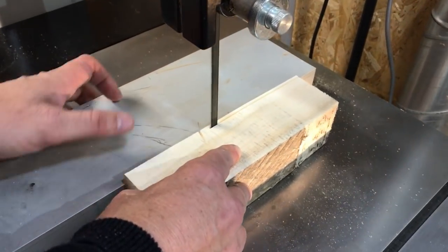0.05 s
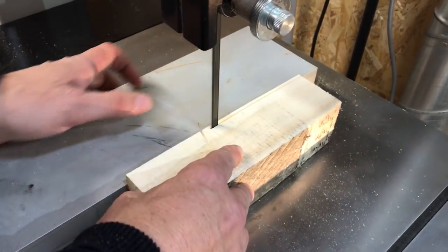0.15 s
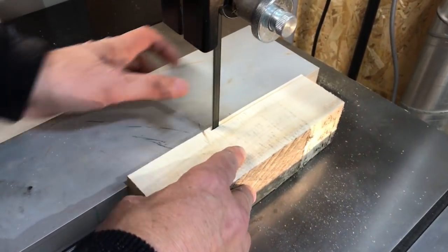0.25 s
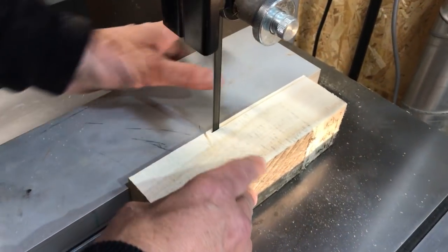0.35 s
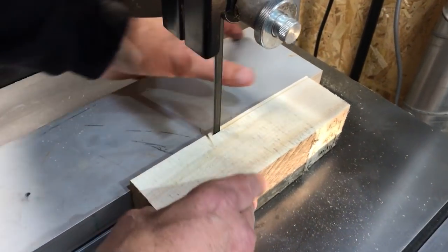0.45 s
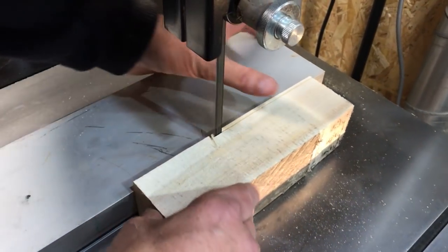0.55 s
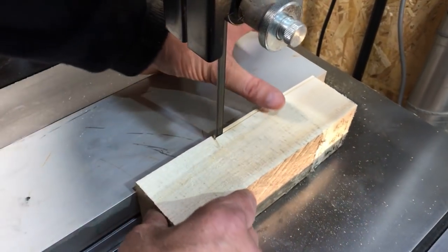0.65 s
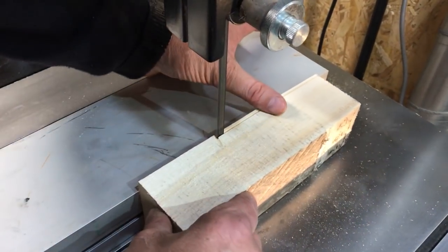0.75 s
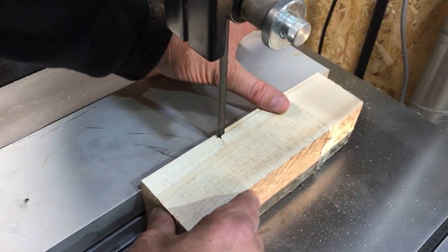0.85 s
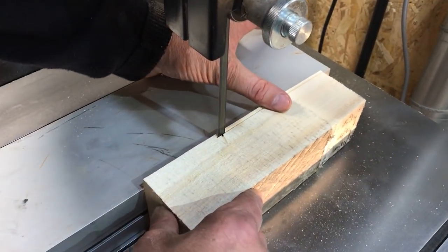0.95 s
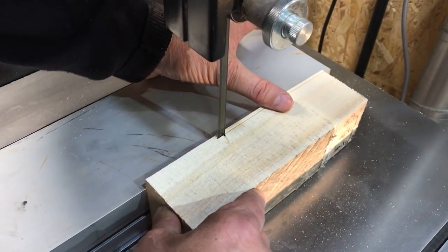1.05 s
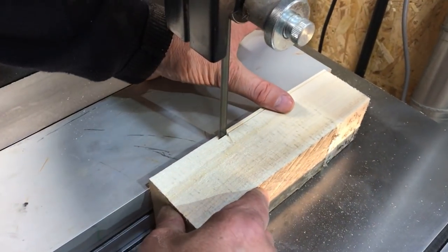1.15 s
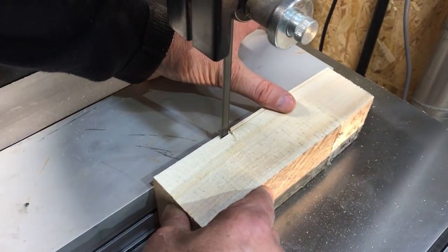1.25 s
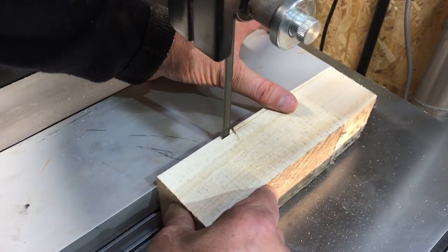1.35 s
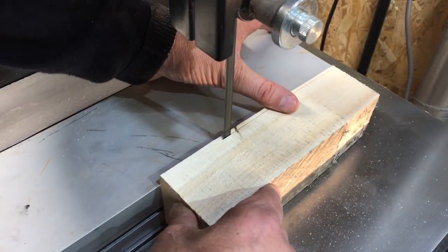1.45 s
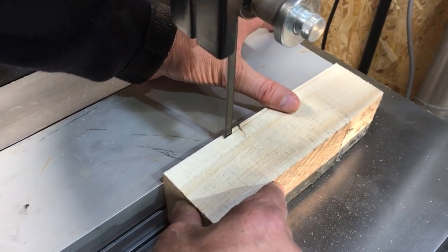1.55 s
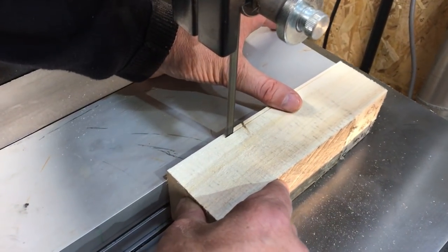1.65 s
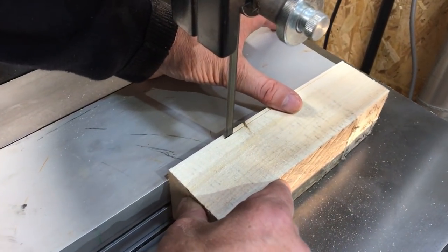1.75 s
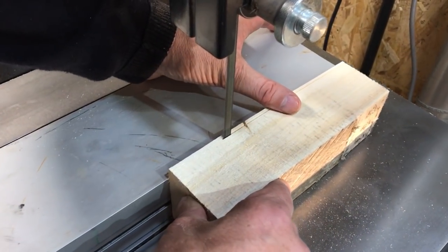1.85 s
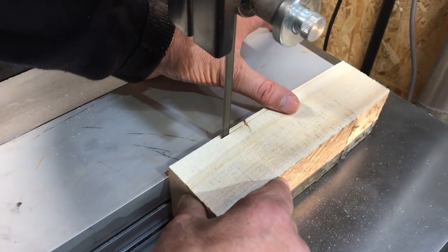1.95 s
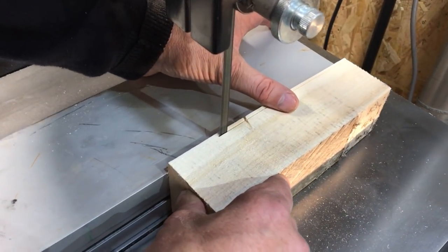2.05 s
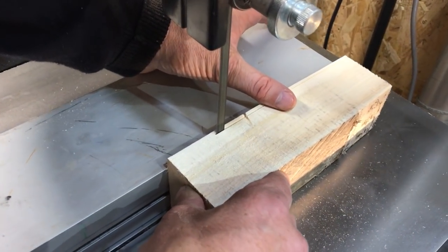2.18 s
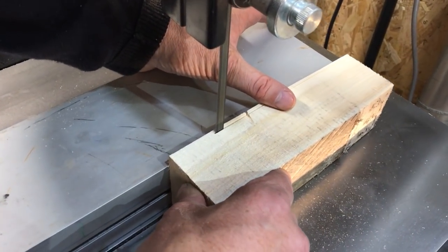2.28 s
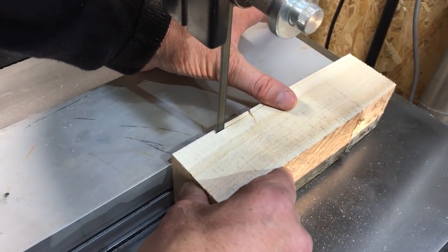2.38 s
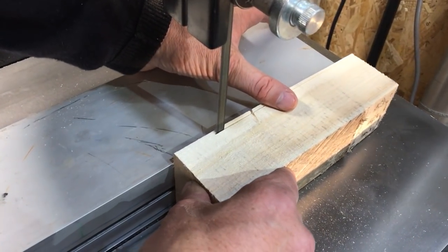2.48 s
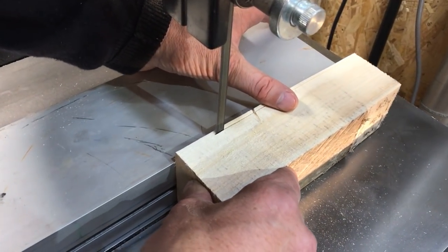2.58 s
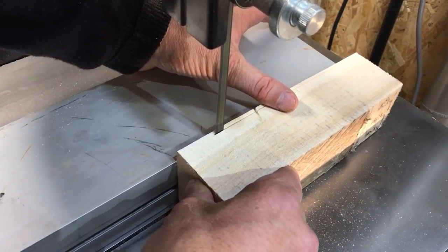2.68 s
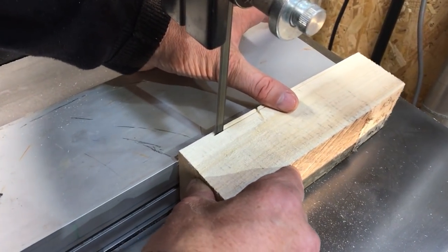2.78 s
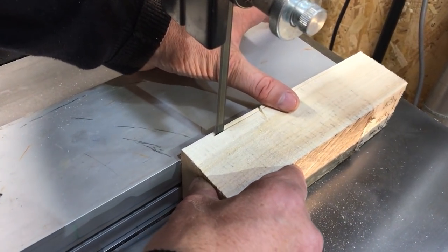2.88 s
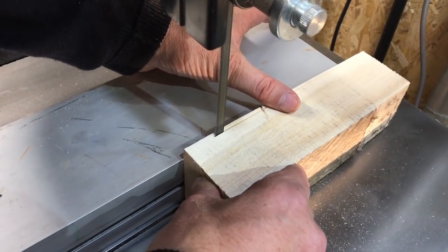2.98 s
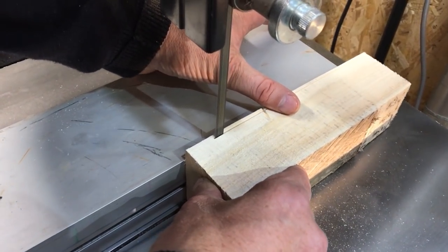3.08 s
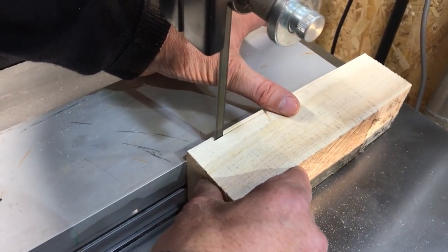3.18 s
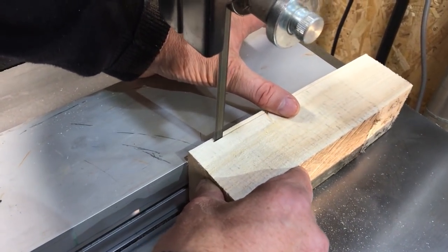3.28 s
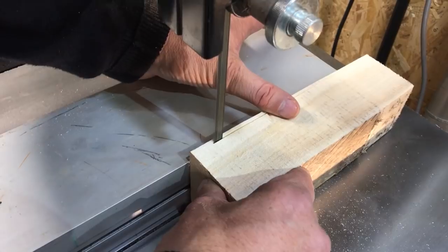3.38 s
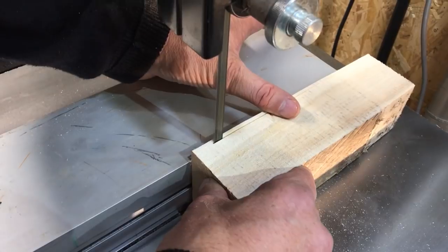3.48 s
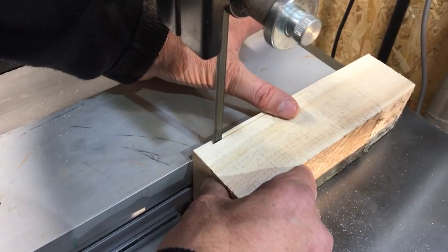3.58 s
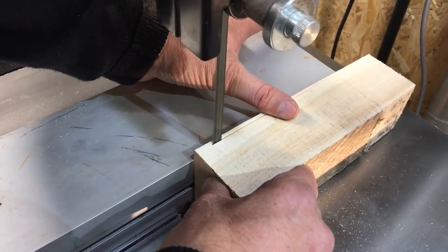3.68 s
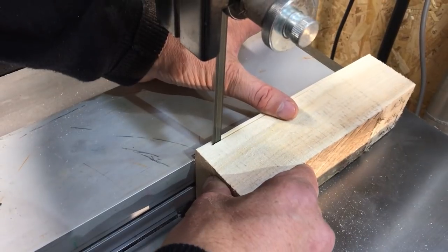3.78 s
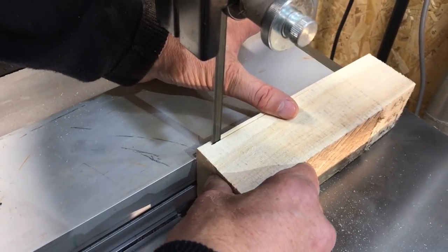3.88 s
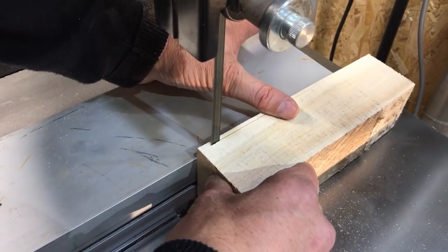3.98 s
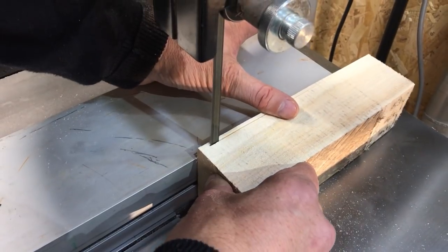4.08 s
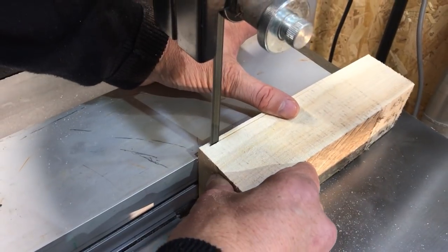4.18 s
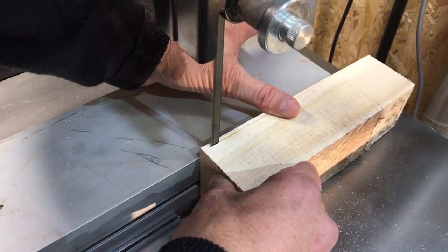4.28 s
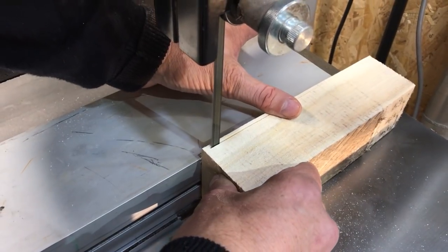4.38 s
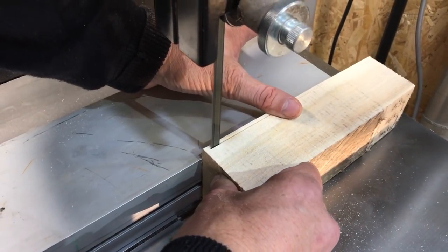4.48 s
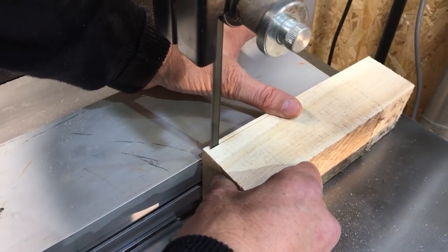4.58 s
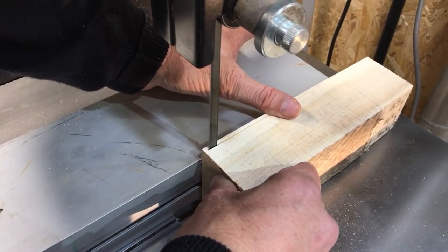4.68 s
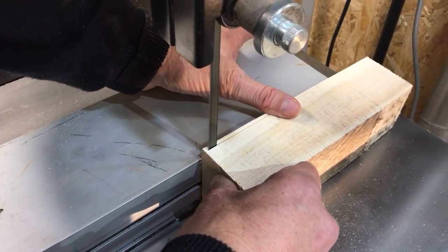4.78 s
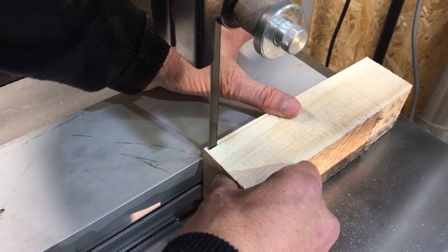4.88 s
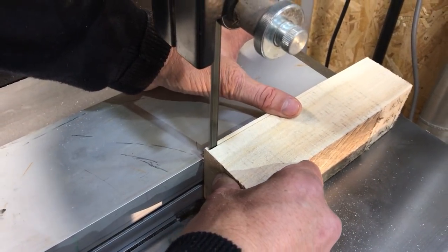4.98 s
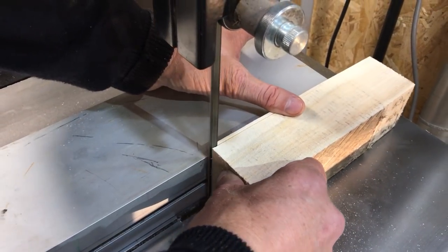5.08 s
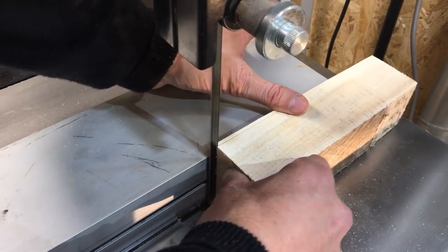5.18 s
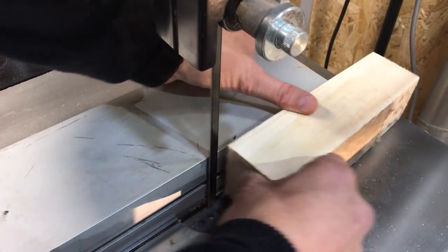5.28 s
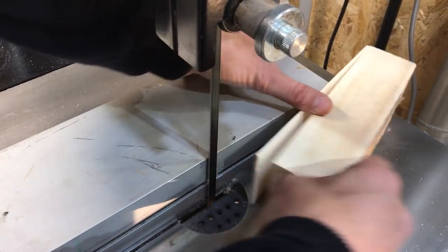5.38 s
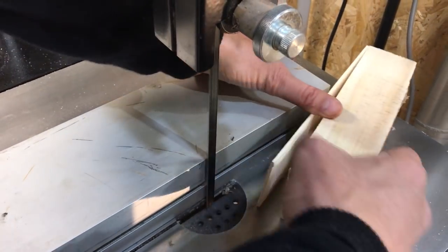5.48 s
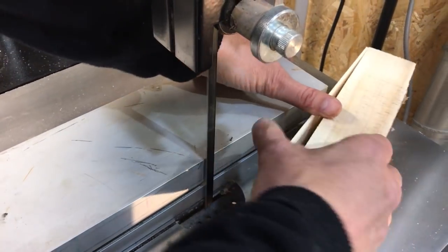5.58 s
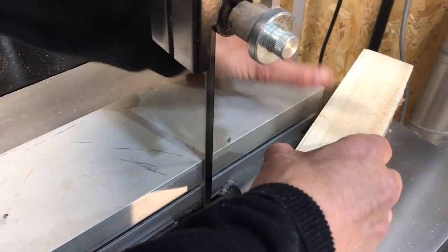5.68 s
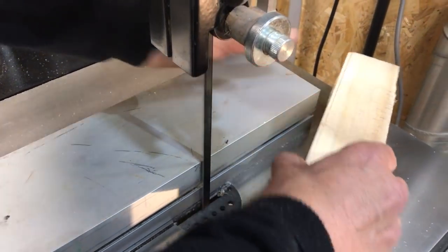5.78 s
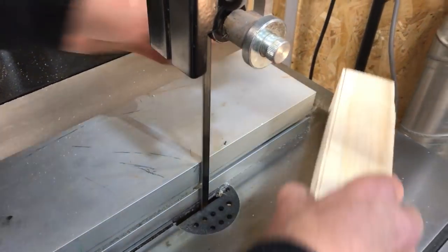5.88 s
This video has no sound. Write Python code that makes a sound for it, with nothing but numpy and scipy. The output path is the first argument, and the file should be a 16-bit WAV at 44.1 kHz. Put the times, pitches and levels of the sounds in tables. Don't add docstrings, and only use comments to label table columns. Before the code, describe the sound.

From the first instant a bandsaw is cutting through a wooden block, loud and close to a phone in a small, short-echoed workshop. The sound is a dense, rough, ringing whine, strongest around 700 to 1500 Hz, with bright chip hiss above it and thin whistles at steady high pitches. It throbs quickly and unevenly; short sung tones swell and fade, and tiny dips and surges mark the teeth catching in the grain. From 1.5 to 4 seconds the ring shifts slightly as the slit lengthens. From about 4.4 seconds it becomes more hollow and tonal, near 750 Hz, and the finest hiss opens up at 4.8. At about 5.18 seconds a last puff of chips ends the cut abruptly. A metallic frame ring falls away fast, leaving a much quieter whirr and low motor hum that gradually rise until 6 seconds, with a few faint bright ticks at 5.4, 5.5, 5.75 and 5.87.

```python
import sys
import numpy as np
from scipy import signal
from scipy.fft import rfft, irfft, next_fast_len
from scipy.io import wavfile
from scipy.ndimage import map_coordinates

SR = 44100
rng = np.random.default_rng(int(sys.argv[2]) if len(sys.argv) > 2 else 0)


def linear_from_db(decibels):
    return 10 ** (np.asarray(decibels, float) / 20)


def dump_mix(stems):
    frames = np.atleast_2d(stems).T
    limited = np.clip(frames, -1, 1)
    pcm = np.round(limited * 32767).astype(np.int16)
    wavfile.write(sys.argv[1], SR, pcm)


N = 261950
T = np.arange(N) / SR
EXIT_S, EASE_S = 5.178, .012
TOP_OFF_DB_PER_S = 480

# t/s, f/Hz
TOOTH_RATE = [(0, 2273), (.5, 2279), (1.1, 2274.5), (1.8, 2272.5), (2.1, 2274), (2.4, 2272), (2.8, 2274),
              (3.15, 2273), (3.35, 2278), (3.75, 2277.5), (4.4, 2284), (4.8, 2288), (5.2, 2290)]
# t/s, level/dB
FEED = [(0, .5), (1.2, .5), (2.2, -.4), (3.7, -0.5), (4.3, -1.4), (4.9, 0), (5.12, -1)]
LOOP_HZ = 4.7


def cut():
    turn = np.cumsum(curves(TOOTH_RATE)[0]) / SR
    feed_db, = curves(FEED)
    throb_db = 0.47 * np.sin(4 * np.pi * LOOP_HZ * T + 0.11) + .5 * np.sin(8 * np.pi * LOOP_HZ * T + 0.26)
    throb_db = throb_db + 0.71 * wobble(22.21) + 1.45 * wobble(60)
    return block(turn, feed_db, throb_db) + chips(turn, feed_db, throb_db) + song() + whistle(turn)


def tearing(turn, depth, grit_db):
    tooth_gain = linear_from_db(grit_db * rng.standard_normal(int(turn[-1]) + 2))
    size = tooth_gain[turn.astype(int)]
    return unit(rng.standard_normal(N) * size * (1 + depth * np.cos(2 * np.pi * turn)))


# t/s, ring change/dB, chip change/dB, length/s
BITES = [(.08, 0, 1.5, .02), (0.42, -2, 0, 0.049), (1.67, -3, 0, .02), (3.96, 0, -2, .02),
         (3.37, 0, -1, .02), (2.0, 1, 1, .03), (0.529, -5, -2.4, 0.012), (0.64, -4, 0, 0.012),
         (0.875, -4, -1.5, 0.02), (1.033, -0.5, 0.2, 0.08), (1.613, -3.5, -3.5, 0.02),
         (1.753, 2.5, 1.7, 0.066), (1.856, -0.5, -3, 0.06), (2.225, 1.5, 3, 0.027),
         (2.705, 1.7, -0.5, 0.019), (2.84, -1, -1.5, 0.055), (3.083, 0.2, 1.5, 0.082),
         (3.322, -3.2, -3, 0.03), (3.444, -1.5, -6, 0.025), (3.501, 3.5, 0.5, 0.021), (3.6, 3, 3, 0.011),
         (3.836, 1.3, 1.6, 0.05), (4.171, -0.5, -1.4, 0.02), (4.306, -2.5, -2.0, 0.03),
         (4.477, 1.5, 2.0, 0.02), (4.624, -0.3, -4, 0.017), (4.734, -3.5, -7, 0.029),
         (4.854, 1.5, 3.5, 0.058), (4.859, -5, -8, 0.0099), (5.008, 0.5, 5.5, 0.018),
         (5.047, 0, -2.5, .006), (5.092, 0, -3, .008), (5.11, 1, 3.5, .015), (4.772, 0, -2.5, .006),
         (5.068, -2, -3.5, 0.03)]


def ring_bites_db():
    return bumps([(s, db, life) for s, db, _, life in BITES])


# f/Hz, width/Hz, level/dB
BLOCK_EARLY = [(687, 96, -13), (712, 18, 0), (1214, 29, -10.5), (1295, 32.5, 1.5), (1447, 32, -5),
               (1815, 66, -11.5), (2034, 72, -12), (2620, 25, -13), (2770, 78, -16), (3025, 53, -11),
               (3490, 160, -26)]
BLOCK_MIDDLE = [(664, 19, -9.5), (736, 35, -1.5), (1247, 42, -5), (1316, 27.5, 0.5), (1435, 34, -0.5),
                (1761, 28, -5), (1999, 52, -3), (2540, 120, -11.5), (2765, 180, -13), (3027, 32, -3.5),
                (3700, 125, -16)]
BLOCK_LATE = [(571.6, 8.9, -9), (746, 17, 0), (910, 30, -8.5), (1090, 22, -14), (1286, 22, -1.5),
              (1513, 12, -6.5), (1834, 55, -19), (2065, 23, -6), (3040, 45, -15), (4020, 140, -24)]
BLOCK_LAST = [(521, 8.7, -10), (757, 4.4, 8), (834, 17, -6), (989, 16, -9), (1123, 25, -4), (1263, 26, -6),
              (1480, 16, -5.5), (1726, 16, -6), (1920, 310, -18), (3014, 35, -10), (3750, 58, -25)]
# t/s, low ring level/dB, upper ring level/dB, grip on table level/dB
STAGES = [
    (.4, -14, -17.5, -4.5),
    (1.6, -14.5, -17.5, -1),
    (3.3, -16.5, -20, 0),
    (4.5, -13.5, -12.5, -8),
    (4.9, -15, -16.5, -6),
]
# f/Hz, density/dB per Hz
TEAR = [(300, -17), (480, -10), (800, -8), (1050, -4), (1600, -3.5), (2300, -2.5), (3200, -3.5),
        (4300, -4.5), (6000, -36)]
# f/Hz, width/Hz, level/dB
TABLE = [(512, 10, -17), (582, 12, -9), (633, 12, -13), (723, 10, -5), (828, 14, -10), (898, 14, -13),
         (1112, 10, -15), (1141, 10, -14), (1300, 24, -9), (1417, 12, -3), (1613, 10, -10), (1747, 10, -3),
         (1910, 12, -10), (1998, 14, -4), (2470, 14, -6), (2550, 20, -11)]
LET_GO_S, LET_GO_DB = 5.05, -7
RING_OFF_DB_PER_S = 200


def block(turn, feed_db, throb_db):
    stage_s = [row[0] for row in STAGES]
    low_db, upper_db, grip_db = curves(STAGES)
    force = tearing(turn, depth=0.54, grit_db=1.0)
    wood = linear_from_db(-20.5) * filtered(force, shape(TEAR))
    stage_modes = (BLOCK_EARLY, BLOCK_EARLY, BLOCK_MIDDLE, BLOCK_LATE, BLOCK_LAST)
    for share, table in zip(np.eye(len(STAGES)), stage_modes):
        wood = wood + np.interp(T, stage_s, share) * filtered(force, modes(table))
    steel = linear_from_db(grip_db) * filtered(tearing(turn, depth=0.34, grit_db=2.0), modes(TABLE))
    low, upper = split(walls(wood + steel, t60=.2, wet_db=-14), hz=1600)
    ring_db = feed_db + ring_bites_db() - RING_OFF_DB_PER_S * broken_out()
    ring_db = ring_db + LET_GO_DB * np.clip(since(LET_GO_S) / (EXIT_S - LET_GO_S), 0, 1)
    low_gain = linear_from_db(low_db + 0.53 * throb_db)
    upper_gain = linear_from_db(upper_db + 0.37 * throb_db)
    return linear_from_db(ring_db) * (low_gain * low + upper_gain * upper)


# f/Hz, density/dB per Hz
CHIPS = [(1940, -5.5), (3300, -9), (3620, -0.5), (4720, -2.5), (4940, -2.5), (5380, -0.5), (8320, -5.5),
         (8820, -5.5), (10300, -13), (11200, -7), (12100, -10.0), (14100, -8.5), (15600, -11.0),
         (16500, -18)]
# f/Hz, width/Hz, level/dB
BLADE = [(3714, 40, -4), (4194, 40, -4), (5209, 30, -3), (5500, 60, -8), (6024, 60, -4), (6325, 30, -5),
         (8374, 50, -7), (8800, 80, -8), (9874, 40, -9)]
HISS_DB, TOP_DB = -22, -25.5
LAST_SPRAY_DB, LAST_SPRAY_S = 3, 0.023
OPEN_S, OPEN_DB, TOP_SHARE = 4.76, 1.8, 0.8
CHIPS_OFF_DB_PER_S = 260


def chips(turn, feed_db, throb_db):
    puff = (EXIT_S - LAST_SPRAY_S, LAST_SPRAY_DB, LAST_SPRAY_S)
    chip_db = feed_db + bumps([(s, db, life) for s, _, db, life in BITES] + [puff])
    hiss_db = HISS_DB - CHIPS_OFF_DB_PER_S * broken_out() + 0.28 * wobble(12)
    open_db = OPEN_DB * np.clip(since(OPEN_S) / .03, 0, 1)
    top_db = TOP_DB + open_db - TOP_OFF_DB_PER_S * broken_out() + .4 * wobble(11)
    force = tearing(turn, depth=0.27, grit_db=1.25)
    spray = filtered(force, lambda f: shape(CHIPS)(f) * (1 + 0.51 * abs(modes(BLADE)(f))))
    hiss, top = split(walls(spray, t60=.1, wet_db=-11), hz=9000)
    hiss_gain = linear_from_db(hiss_db + chip_db + 0.55 * throb_db)
    top_gain = linear_from_db(top_db + TOP_SHARE * chip_db + 0.7 * throb_db)
    return hiss_gain * hiss + top_gain * top


SING = {723: [(.0, -17, .03), (.105, -13, 0.04), (.5, -17, 0.24), (.803, -22, 0.047), (1.12, -21, .03),
        (1.3, -21, .03), (1.84, -20, .02), (2.32, -21, .03), (2.6, -21, .04), (1.222, -21, 0.033),
        (1.43, -22, .04), (1.54, -19.5, 0.035), (1.771, -16.5, 0.069), (2.03, -19.5, 0.029),
        (2.225, -14.5, 0.044), (2.434, -20, 0.017), (2.715, -19, 0.047), (2.91, -23, 0.042),
        (3.15, -21.5, 0.032)], 731: [(3.22, -20, .04), (3.33, -19, 0.15), (3.68, -19, .05),
        (4.25, -22, .03), (3.82, -16.5, 0.081), (4.0, -17.5, 0.04), (4.1, -20.5, 0.096)],
        1285: [(.14, -17.5, .05), (.44, -21, .05), (.668, -17, .032), (.95, -17, 0.057), (1.2, -23, .08),
        (2.4, -22, .12), (3.15, -21, .04), (3.85, -26, .12)], 1308: [(.04, -19, 0.046), (.24, -15.5, 0.046),
        (1.05, -19, .05), (1.69, -16.5, .08), (1.95, -18, 0.066), (2.15, -16.5, .05), (2.55, -21, 0.043),
        (2.84, -19.5, .05), (3.013, -19, 0.063), (3.25, -20, 0.045)], 748: [(4.444, -19, 0.02),
        (4.575, -14, 0.041), (4.664, -14, 0.023), (4.9, -21, .03)], 753: [(4.74, -18.5, 0.044),
        (4.825, -14, 0.031), (4.92, -14, 0.08), (5.05, -15, 0.053)]}
SING_UPPER = {1421: [(.788, -21.5, 0.17), (1.287, -20, 0.091), (1.512, -18, 0.051), (1.771, -17, 0.032),
              (3.0, -22, .1)], 1444: [(2.235, -25, 0.23), (2.65, -25, 0.087), (3.15, -24, .2),
              (3.7, -25, .2)], 1465: [(3.92, -19.5, 0.055), (4.1, -20.5, 0.037), (4.216, -25, 0.039),
              (4.43, -17.5, 0.26), (4.755, -21, .06), (5.05, -23.5, .06)], 2000: [(.494, -18, 0.027),
              (1.053, -24, 0.079), (1.45, -25, .05), (1.65, -25, .05), (2.15, -24, 0.059), (2.35, -22, .04),
              (2.55, -23, 0.045), (2.75, -23, .05), (2.93, -19, .05)], 2022: [(3.04, -24, .05),
              (3.4, -21.5, 0.1), (3.95, -21, 0.045), (3.76, -24, 0.15), (4.08, -23.5, 0.13)],
              3032: [(4.798, -20, 0.048), (4.98, -24, .04), (4.92, -16.5, 0.017), (5.02, -29, 0.033),
              (5.112, -21.5, .02)]}


def song():
    total = 0
    for hz, rows in (SING | SING_UPPER).items():
        swell = bumps([(s, linear_from_db(db - 0.5), life) for s, db, life in rows])
        total = total + swell * tone(hz * T, 0.62, 22)
    return total


# multiple of tooth rate, level/dB
TEETH = [(2, -43), (3, -41.5), (4, -38.5), (5, -48), (6, -44)]
# multiple of a third of the tooth rate, level/dB
TOOTH_SET = [(4, -42), (7, -48), (11, -47), (13, -49), (14, -52), (16, -49), (17, -47), (19, -50),
             (20, -51)]
# multiple of tooth rate, t/s, rise/dB, length/s
FLUTTER = [(2, 0.64, 6, .25), (2, 3.57, 10, 1.7), (3, 2.5, 6, .6), (3, 3.9, 6, .4), (3, 4.95, -8, .25),
           (2, 5, -6, .25), (6, 4.5, 4, .2), (4, .9, 3, 0.72), (4, 2.1, 6, .35), (4, 3.6, 7, 0.37),
           (4, 4.9, -15, 0.45), (5, .05, 12, .12), (5, .55, 11, 0.25), (5, 2.25, 8, .1), (5, 4.8, 9, .12),
           (6, .3, 6, .15), (6, 2.15, 6, .06), (6, 3.6, 6, .3), (4, 0.092, 5, .06), (6, 4.95, -6, .3),
           (5, 1.1, 19, 0.27), (5, 2.7, 11, .25), (5, 3.7, 11, 0.23), (6, .9, 7, .7)]


def whistle(turn):
    turn = turn + .018 * wobble(35)
    total = 0
    for k, db in TEETH:
        rise_db = bumps([row[1:] for row in FLUTTER if row[0] == k])
        total = total + linear_from_db(db + 2 + rise_db + 1.9 * wobble(17)) * tone(k * turn, 0.48, 30)
    for k, db in TOOTH_SET:
        total = total + linear_from_db(db + 2 + 2.5 * wobble(6)) * tone(k * turn / 3, .3, 30)
    return total * linear_from_db(-TOP_OFF_DB_PER_S * broken_out())


# t/s, f/Hz,
# level/dB, length/s
FLARES = [(.12, 580, -26.5, 0.058), (.6, 580, -24, .06), (1.77, 580, -25.5, 0.054), (2.3, 580, -25, .1),
          (.25, 580, -24, .03), (.75, 580, -23, .03), (1.88, 580, -25, .05), (2.45, 580, -26, .03),
          (1.29, 580, -28.5, .05), (2.72, 582, -21.5, 0.027), (3.53, 578, -17.5, 0.02),
          (4.99, 510, -26, 0.042), (4.47, 1900, -20, 0.026), (5.12, 512, -33, 0.03),
          (4.5, 1120, -22.5, 0.06), (.4, 5209, -37, .5), (5.155, 8367, -26, .025), (5.15, 12200, -31, .03),
          (5.14, 9950, -33, .04), (5.88, 762, -32, .05), (5.65, 765, -36, .04), (5.57, 650, -41, .04),
          (5.9, 990, -39, .06), (5.17, 1025, -30, .03), (4.8, 11700, -33, .03), (5.16, 9150, -28, .02)]


def flares():
    return sum(linear_from_db(db) * np.exp(-((T - s) / life) ** 2) * tone(hz * T, 0.73, 40)
               for s, hz, db, life in FLARES)


# f/Hz, struck level/dB, fall/dB per s, sustained level/dB, fade/dB per s
FRAME = [
    (737, -21.5, 280, -35, 8),
    (770, -50, 100, -47, -10),
    (801, -26, 200, -31, 16),
]
STRUCK_S, DAMPED_S, DAMPED_DB, DAMPED_LENGTH_S = 5.155, 5.795, -18, 0.044


def frame():
    after = since(STRUCK_S)
    total = 0
    for hz, db, fall_db, held_db, fade_db in FRAME:
        gain = linear_from_db(db - fall_db * after) + linear_from_db(held_db - fade_db * after + 1.3 * wobble(9))
        total = total + gain * tone(hz * T, 0.28, 7)
    onset = np.clip(1 + (T - STRUCK_S) / 0.067, 0, 1)
    return onset * linear_from_db(bumps([(DAMPED_S, DAMPED_DB, DAMPED_LENGTH_S)])) * total


# f/Hz, density/dB per Hz
BASS = [(13, -50), (22, -17), (69, -16.5), (113, -6.5), (145, -10), (233, -6), (283, -9.5), (396, -1),
        (439, -11.5), (480, -13), (620, -24), (1060, -120)]
# f/Hz, width/Hz, level/dB
HUM = [(50, 5, 10), (90, 8, -11), (120, 6.6, 4), (174, 10.5, 6), (247, 7.9, 8.5), (406, 33, 7.5)]
RUMBLE_DB, RUMBLE_SHARE, WARM_DB, WARM_S = -35.5, 1.3, 5, 4.61


def rumble():
    noise = rng.standard_normal(N)
    bass = unit(filtered(noise, lambda f: shape(BASS)(f) * (linear_from_db(2.0) + abs(modes(HUM)(f)))))
    level_db = RUMBLE_DB + RUMBLE_SHARE * ring_bites_db() + bumps([(WARM_S, WARM_DB, .5)])
    return linear_from_db(level_db - 31 * since(EXIT_S)) * bass


THRUM_DB, THRUM_S, THRUM_OFF_DB_PER_S = -36.5, 1.24, 7


def thrum():
    noise = unit(filtered(rng.standard_normal(N), modes([(227, 30, 0)])))
    return linear_from_db(THRUM_DB - THRUM_OFF_DB_PER_S * since(THRUM_S)) * noise


# f/Hz, density/dB per Hz
WHIRR = [(260, -45), (440, -14), (621, -14), (800, -8), (1060, -12), (1430, -12), (2380, -15), (3260, -18),
         (5000, -18), (6600, -18), (6800, -27), (7300, -27), (8700, -24), (9800, -27), (10500, -31),
         (11500, -29), (16500, -30)]
# f/Hz, width/Hz, level/dB
PANELS = [(650, 25, -49), (838, 20, -45), (950, 25, -46), (1142, 10, -50), (1418, 10, -47), (1746, 8, -53),
          (2500, 15, -50), (3047, 40, -48), (3900, 60, -49), (4690, 50, -50), (6500, 200, -45),
          (7090, 50, -46), (8500, 250, -54), (9350, 60, -56), (9650, 60, -57), (11450, 200, -58),
          (4300, 60, -49)]
# f/Hz, width/Hz, level/dB
MOTOR = [(50, 5, -14), (70, 30, -16), (90, 8, -6), (111, 10, -3), (186, 10, -4), (200, 8, -2), (221, 8, -5),
         (247, 8, -6), (300, 6, -5), (350, 12, -7), (371, 8, -5), (403, 14, -3)]
WHIRR_DB, AIR_DB, MOTOR_DB, MOTOR_SHARE = -43, -51, -47.5, 1.56
LIFT_DB, LIFT_S = 13, 0.34


def idling():
    lift_db = LIFT_DB * (1 - np.exp(-since(EXIT_S) / LIFT_S))
    noise = rng.standard_normal((3, N))
    whirr, air = split(walls(filtered(noise[0], shape(WHIRR)), t60=.1, wet_db=-6), hz=6750)
    panel_modes = [modes([(hz, w, db - 10 * np.log10(w))]) for hz, w, db in PANELS]
    panels = unit(filtered(noise[1], lambda f: sum(mode(f) for mode in panel_modes)))
    motor = unit(filtered(noise[2], modes(MOTOR)))
    shake_db = .7 * wobble(30)
    free = linear_from_db(WHIRR_DB + 4.0 + shake_db) * whirr + linear_from_db(WHIRR_DB - 3.5) * panels
    free = free + linear_from_db(AIR_DB + shake_db) * air
    motor_db = MOTOR_DB - 1 + MOTOR_SHARE * lift_db + 2.5 * wobble(14)
    return linear_from_db(lift_db) * free + linear_from_db(motor_db) * motor


# t/s, peak level/dB
TICKS = [(5.40, -38), (5.865, -38), (5.5214, -37), (5.7528, -35)]


def ticks():
    burst = sum(linear_from_db(db - 1) * np.exp(-((T - s - .004) / 0.003) ** 2) for s, db in TICKS)
    return burst * unit(filtered(rng.standard_normal(N), shape([(3000, -30), (8000, 0), (15700, -3)])))


def walls(x, t60, wet_db):
    t = np.arange(SR // 4) / SR
    tail = rng.standard_normal(len(t)) * linear_from_db(-60 * t / t60)
    return unit(x + linear_from_db(wet_db) * signal.fftconvolve(x, tail / np.linalg.norm(tail))[:N])


def tone(turns, rough, rate):
    return np.sqrt(2) * np.sin(2 * np.pi * turns + rough * wobble(rate))


def unit(x):
    return x / np.sqrt(np.mean(x ** 2) + 1e-20)


def curves(rows):
    s, *cols = np.transpose(rows)
    return [np.interp(T, s, c) for c in cols]


def wobble(rate):
    coarse = T[::64]
    points = rng.standard_normal(int(N * rate / SR) + 4)
    return np.interp(T, coarse, map_coordinates(points, [coarse * rate]))


def bumps(rows):
    coarse = T[::32]
    return np.interp(T, coarse, sum(h * np.exp(-((coarse - s) / life) ** 2) for s, h, life in rows))


def since(s):
    return np.maximum(T - s, 0)


def broken_out():
    return EASE_S * np.logaddexp(0, (T - EXIT_S) / EASE_S)


def filtered(x, response):
    m = next_fast_len(N + 8192)
    return irfft(rfft(x, m) * response(np.fft.rfftfreq(m, 1 / SR)), m)[:N]


def shape(points):
    f, db = np.transpose(points)
    return lambda hz: linear_from_db(np.interp(np.log(hz + 1), np.log(f + 1), db, left=-120, right=-120))


def modes(table):
    def response(f):
        total = 0
        for k, (c, w, db) in enumerate(table):
            total = total + (-1) ** k * linear_from_db(db) * 1j * f * w / (c * c - f * f + 1j * f * w)
        return total
    return response


def split(x, hz):
    low = filtered(x, lambda f: 1 / (1 + (f / hz) ** 20))
    return unit(low), unit(x - low)


def scene():
    machine = frame() + rumble() + thrum() + idling()
    return np.tile(cut() + flares() + machine + ticks(), (2, 1))


def roll_off(x):
    return signal.sosfilt(signal.butter(12, 16940, fs=SR, output="sos"), x)


# f/Hz, width/Hz, level/dB
DIPS = [(1050, 35, -3), (1358, 14, -5), (1555, 19, -2), (2380, 30, -3.5), (3220, 40, -5), (4080, 42, -1),
        (787, 12, -3.5)]
TOP_HZ = 15790


def record(dry):
    heard = filtered(dry[0], lambda hz: linear_from_db(sum(db * np.exp(-((hz - c) / w) ** 2) for c, w, db in DIPS)))
    held = heard / (1 + np.abs(heard / .76) ** 6) ** (1 / 6)
    band = filtered(held, lambda hz: np.clip((TOP_HZ - hz) / 60, 0, 1) ** 2 / (1 + (30 / (hz + 1)) ** 3))
    return roll_off(np.array([band, band]))


dry = scene()
out = record(dry)
dump_mix(out)
```